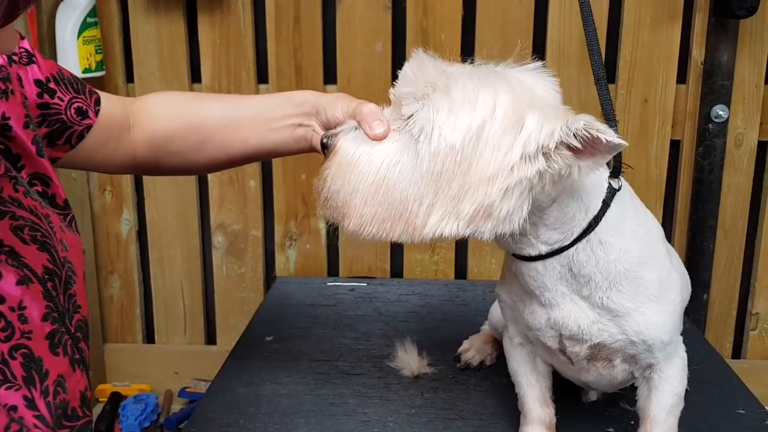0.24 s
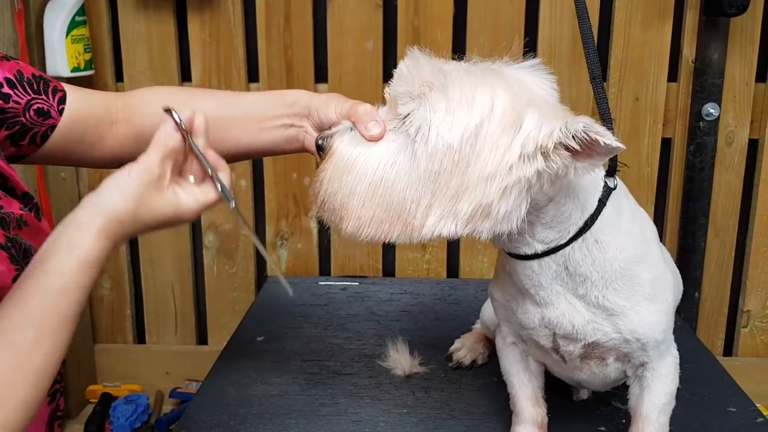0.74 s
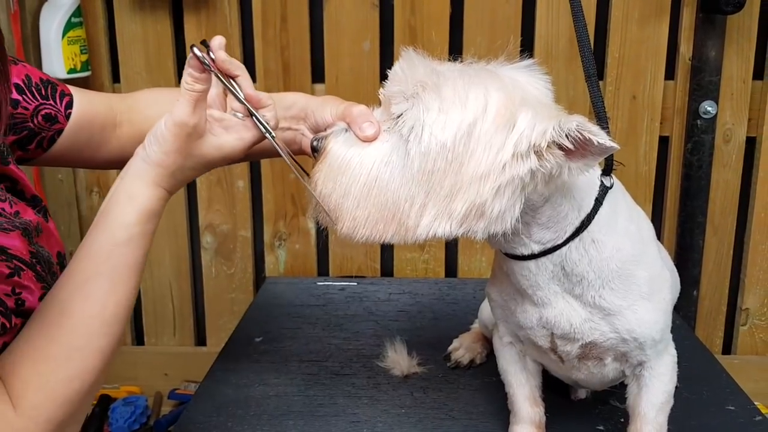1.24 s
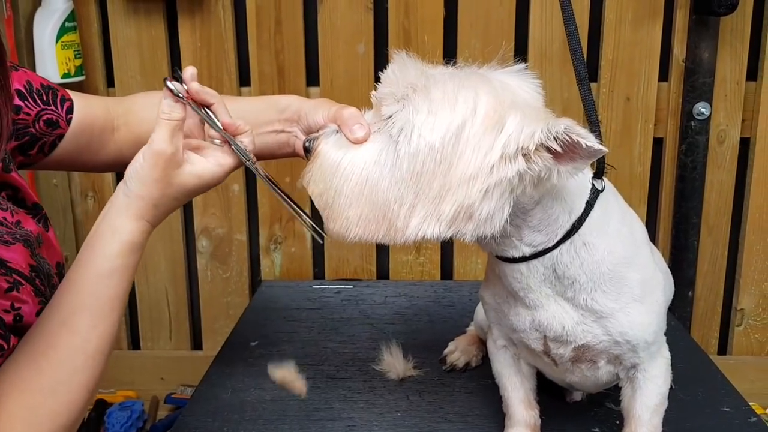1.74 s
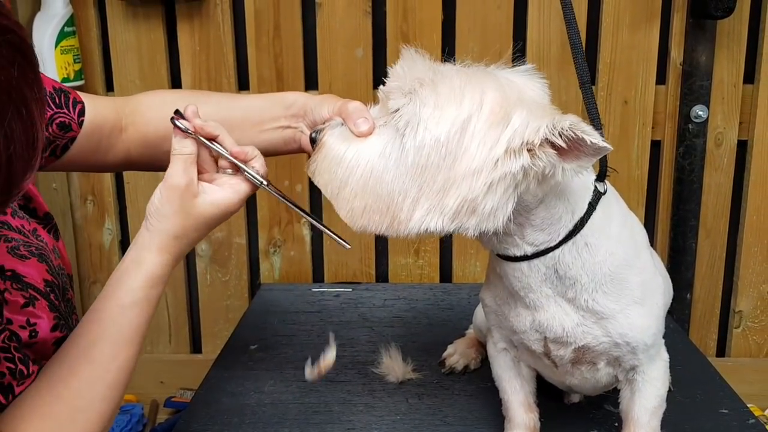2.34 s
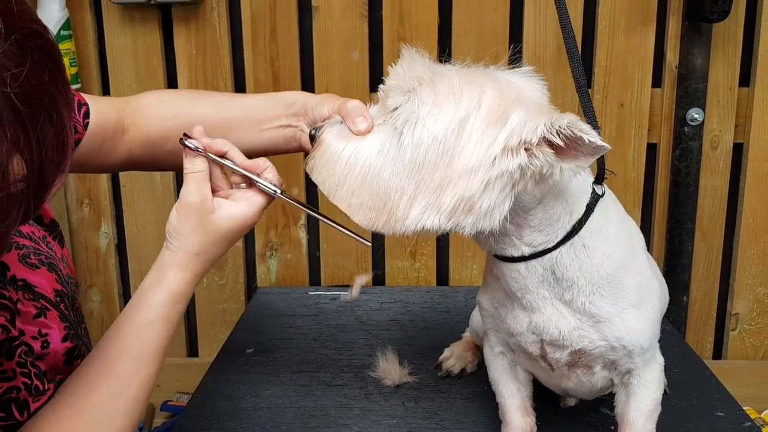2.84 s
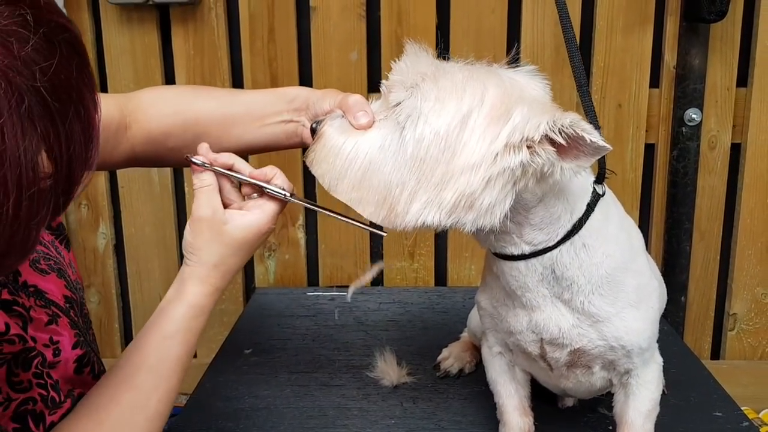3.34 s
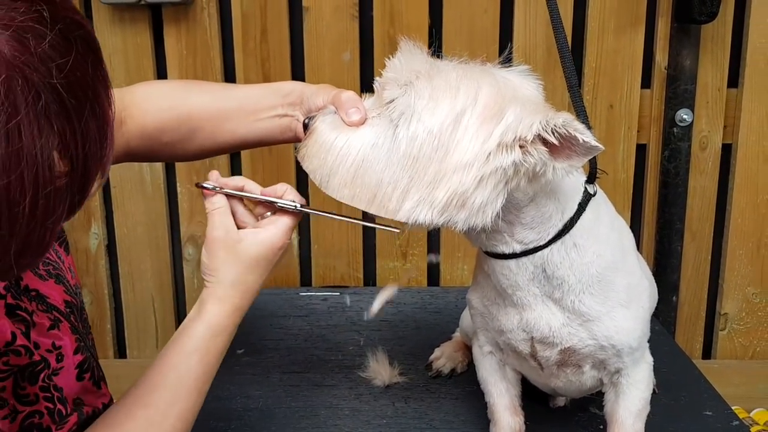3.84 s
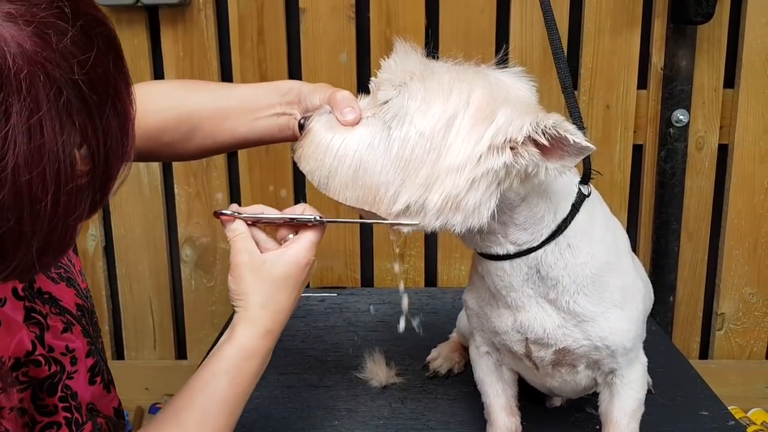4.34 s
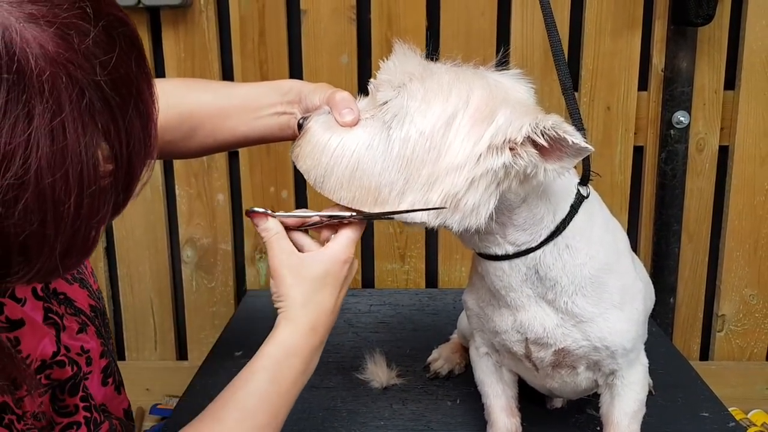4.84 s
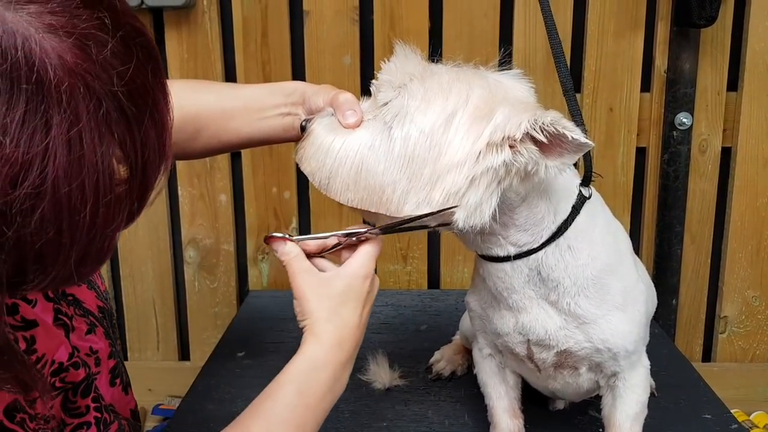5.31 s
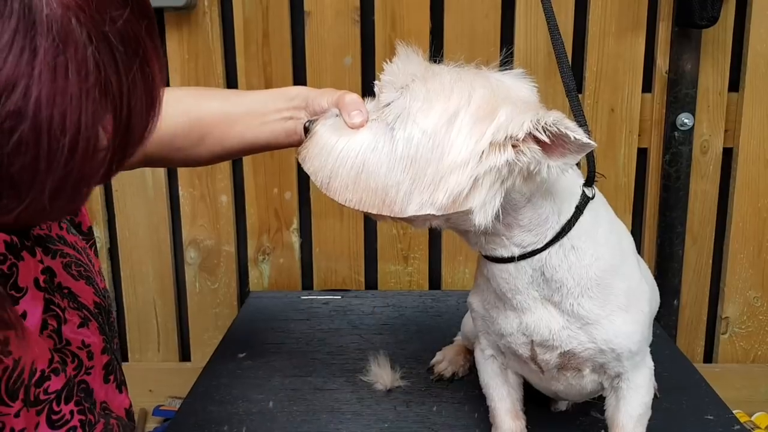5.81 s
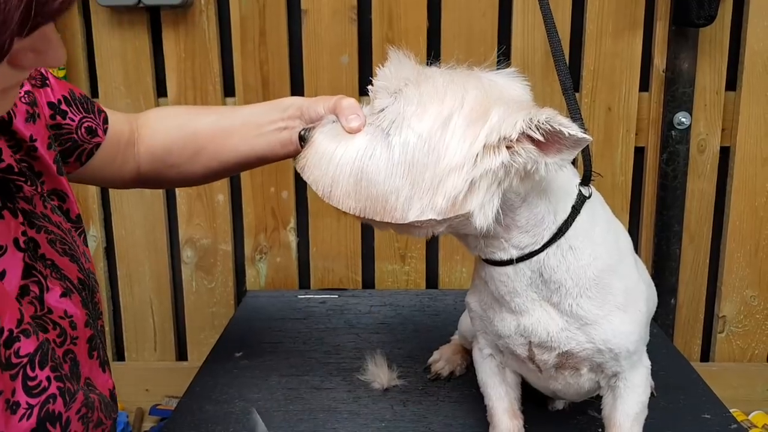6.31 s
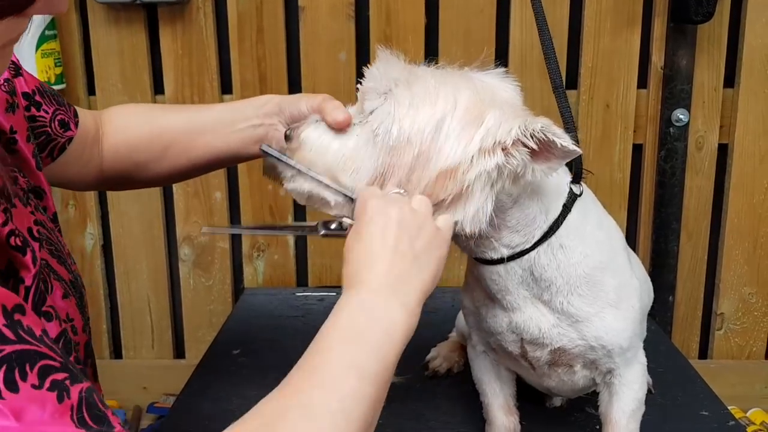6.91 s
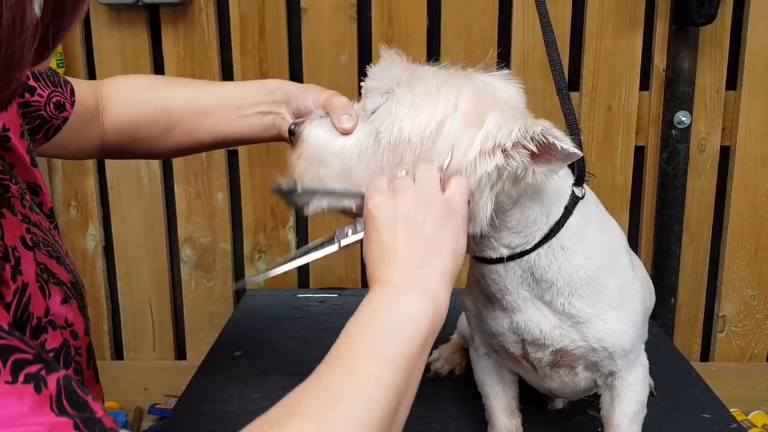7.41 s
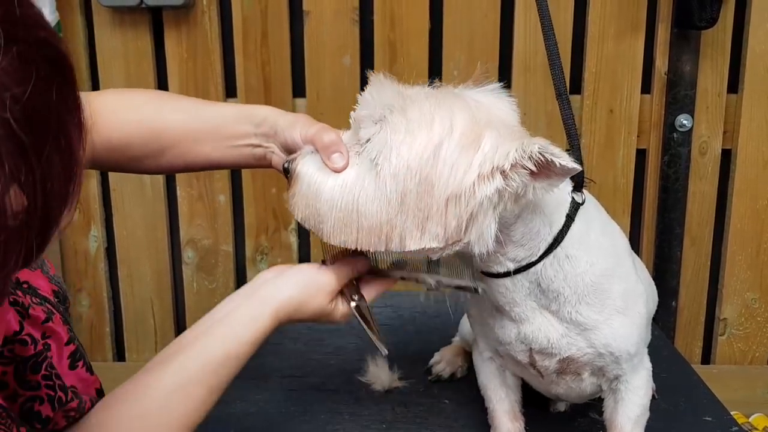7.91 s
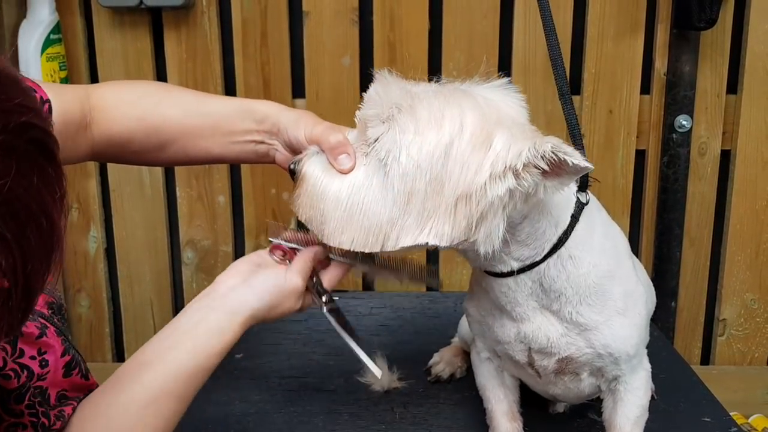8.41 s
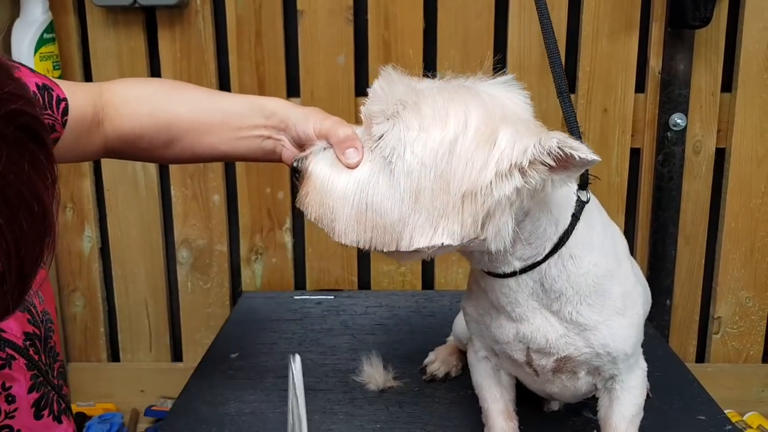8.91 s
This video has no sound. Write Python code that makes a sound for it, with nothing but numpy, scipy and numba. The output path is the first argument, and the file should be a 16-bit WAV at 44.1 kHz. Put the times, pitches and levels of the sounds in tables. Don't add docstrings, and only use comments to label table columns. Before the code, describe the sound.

Steel scissors snip slowly through crunchy dog hair with bright hisses and clicks, then tools clatter loudly onto a booming table in a small room.

```python
import sys
import numpy as np
from scipy import signal
from scipy.fft import rfft, irfft, next_fast_len
from scipy.io import wavfile
from scipy.ndimage import uniform_filter1d
from numba import njit

SR = 44100
rng = np.random.default_rng(int(sys.argv[2]) if len(sys.argv) > 2 else 0)


def boost(x):
    u = np.asarray(x, float) / 20
    return 10 ** u


def master(y):
    cut = np.clip(np.atleast_2d(y).T, -1, 1)
    pcm = np.round(cut * 32767)
    wavfile.write(sys.argv[1], SR, pcm.astype(np.int16))


N = 403956

# [bite t/s, run-up/s, cut level/dB, shut t/s, shut level/dB]
CLOSINGS = [
    (1.57, 0.14, -72, 1.608, -53.5),
    (2.185, 0.11, -53, 2.226, -49),
    (2.734, 0.045, -56.5, 2.804, -47.5),
    (3.246, 0.038, -54, 3.316, -44.5),
    (3.741, 0.035, -52, 3.808, -45.5),
    (4.222, 0.035, -59.5, 4.294, -45),
    (4.4, .03, -62.5, 4.454, -42),
    (4.935, 0.035, -57, 5.012, -45.5),
    (5.406, 0.025, -53.5, 5.467, -58),
]
# [peak t/s, peak level/dB, squeak f/Hz]
OPENINGS = [
    (1.788, -44, 7800),
    (2.419, -42, 8200),
    (2.962, -40.5, 8970),
    (3.49, -41.5, 8630),
    (3.973, -42, 9060),
    (4.637, -44, 8860),
    (5.197, -52, 8300),
]
# [f/Hz, level per Hz/dB]
SLIDE_SPECTRUM = [(3530, -51), (6000, -12.5), (7680, -16), (8640, 0), (9370, -7.5), (10700, -5.5),
                  (11900, -7), (13000, -10), (15800, -18)]
# [f/Hz, level per Hz/dB]
CRUNCH_SPECTRUM = [(1060, -46), (1800, -18), (3250, -18), (4380, -4), (4910, 1), (5700, 0), (7500, -10),
                   (9750, -36), (16500, -120)]
# [peak t/s, length/s,
# level/dB, f/Hz]
SQUEALS = [(.808, .015, -62.5, 4800), (0.83, 0.058, -58, 8400), (0.855, 0.028, -59.5, 7000),
           (0.834, .06, -62, 11000), (1.512, 0.044, -62.5, 8800), (1.569, 0.029, -56.5, 8100),
           (1.57, 0.026, -52.5, 9500), (1.57, 0.031, -57, 12500), (1.792, 0.017, -54, 8100),
           (2.158, .02, -62, 8800), (2.185, .015, -51.5, 9300), (2.227, .02, -50, 12400),
           (2.426, 0.014, -53, 8300), (2.428, .012, -59, 6060), (2.73, 0.023, -55.5, 8400),
           (2.755, .02, -56, 9000), (2.778, .014, -51, 10000), (2.781, .014, -55, 13500),
           (2.969, .008, -47, 8500), (2.97, 0.018, -51, 11000), (3.244, 0.013, -52.5, 9650),
           (3.265, .02, -57, 12700), (3.31, .02, -47, 12000), (3.506, 0.024, -52, 8900),
           (3.74, .03, -62, 9600), (3.804, 0.03, -41.5, 12400), (3.986, .02, -50, 8800),
           (4.229, 0.037, -56, 9700), (4.245, .05, -61, 12700), (4.331, 0.063, -58.5, 8700),
           (4.648, .03, -57, 6400), (2.697, .05, -74, 9500), (3.277, 0.065, -64, 4320),
           (3.769, 0.054, -62, 4470), (2.744, 0.045, -65.5, 4900), (4.257, 0.076, -61.5, 4700),
           (4.267, .015, -54, 8860), (4.304, .03, -50, 12400), (4.454, .015, -46.5, 8670),
           (4.455, .015, -54, 12500), (4.638, 0.028, -57, 8900), (4.958, 0.056, -63, 4900),
           (5.011, 0.021, -45, 8300), (5.013, 0.029, -46.5, 12400), (5.208, 0.019, -50, 8200),
           (5.406, 0.013, -49.5, 8300), (5.429, 0.014, -48, 8200), (5.427, .016, -51, 12000),
           (5.469, 0.014, -41, 8170), (5.47, 0.011, -40, 12200), (4.215, 0.076, -70, 720),
           (4.348, .2, -71, 900), (.5, .2, -64, 125), (.78, 0.23, -62, 127.5), (7.755, 0.0046, -62, 4500)]
# [end t/s, peak level/dB, from f/Hz, to f/Hz]
WHISTLES = [(2.423, -36.5, 10300, 8300), (2.97, -42, 10500, 8600), (3.495, -31.5, 11500, 8700),
            (3.9785, -30, 11500, 8800), (5.2025, -46, 9000, 8400), (5.206, -44, 8500, 8250)]
# [t/s, peak level/dB, main ring f/Hz, handle thud level/dB]
TICKS = [(0.124, -65, 8810, -70), (0.2269, -58.5, 9600, -82), (0.6, -67, 5140, -66),
         (0.724, -54, 8360, -67), (1.6118, -38.5, 11160, -54.5), (2.2335, -37, 10800, -59),
         (2.8054, -32, 8300, -48.5), (3.3176, -38, 12000, -53), (3.811, -43, 12700, -61),
         (4.392, -63, 11000, -85), (4.4555, -35.5, 4070, -53), (5.015, -43.5, 8200, -61.5),
         (5.4675, -38, 7800, -60), (5.896, -68, 3000, -65), (6.432, -42, 8560, -72),
         (6.4872, -40, 8600, -60), (7.2914, -46, 7950, -76), (7.4494, -61, 11700, -86),
         (7.7537, -52, 10100, -75), (8.7194, -57, 6520, -76), (.738, -75, 3000, -61.5),
         (8.794, -63, 8620, -85), (9.136, -59, 11000, -85)]
# [f/Hz, level/dB, t60/s]
BLADE_MODES = [(3670, -19, 0.0025), (4900, -6, 0.005), (8300, 2, 0.0081), (8710, -3, 0.028),
               (9940, -4, 0.006), (12000, 1, 0.0075)]
# [f/Hz, level/dB, t60/s]
HANDLE_MODES = [(443, 3, 0.017), (645, 0, 0.028), (1100, -3, 0.011), (2590, -12, 0.015)]
# [t/s, crack level/dB, crack f/Hz, knuckle
# level/dB, knuckle f/Hz]
STOPS = [(1.612, -57, 2650, -56, 560), (2.2345, -44, 6060, -56, 594), (2.8064, -45, 3650, -49, 623),
         (3.3182, -41, 3650, -52, 600), (3.8121, -53, 2500, -56, 560), (4.4567, -41, 3960, -51, 500),
         (5.015, -58, 3870, -55, 477), (5.469, -54, 3800, -60, 480), (3.3185, -53, 2640, -54, 660),
         (2.8068, -54, 2900, -52, 470), (2.2344, -56, 2540, -62, 1000), (6.2588, -35, 8860, -36.5, 330)]
# [t/s, peak level/dB, contact cut-off f/Hz, clatter re body/dB, slap level/dB]
BLOWS = [(.002, -43.5, 500, -6, -69), (.07, -44.5, 405, 0, -79), (5.9, -54.5, 700, 8, -80),
         (6.032, -58, 300, 11, -74), (6.259, -47, 2500, -19, -33.5), (6.283, -56, 2840, 17.5, -60),
         (6.31, -53, 2510, 14, -60), (6.345, -60.5, 2000, 15, -65), (6.278, -36.5, 426, -4, -60),
         (6.303, -41, 414, -2, -52), (8.814, -68, 2500, -2, -53.5), (8.863, -68, 2500, 1.5, -50),
         (8.868, -48, 2520, 6, -63), (8.875, -45.5, 2500, -5, -46), (8.899, -44, 3270, 16.5, -63),
         (8.9, -17.5, 346, 4.5, -55), (8.908, -16.5, 850, 7.5, -55), (8.919, -12.5, 1530, -6.5, -64),
         (8.932, -23.5, 865, -3, -62), (8.955, -19.5, 880, 1.5, -61), (8.986, -40.5, 2780, 12, -57),
         (9.005, -18, 1500, -3, -62), (9.021, -25, 2000, 9.5, -46), (9.051, -23.5, 900, 3, -55),
         (9.091, -37.5, 1610, 8, -61)]
# [f/Hz, level/dB, t60/s]
TABLE_MODES = [(114.7, -10, 0.3), (162, -19, 0.16), (217.6, -7, 0.11), (248, -6.5, 0.12),
               (308.8, -5.5, 0.2), (376.6, -8, 0.11), (454, -5, 0.2), (525.5, -8.5, 0.14), (599, -1, 0.088),
               (690, -4, 0.059), (756, 2, 0.062), (850, -26, 0.084), (920, -5.5, 0.043),
               (1024, -2.5, 0.054), (1152, 2, 0.039), (1250, -27, 0.067), (1620, -16, 0.043),
               (1745, -1, 0.06), (2039, -2, 0.061), (2367, -3.5, 0.052)]
# [f/Hz, level per Hz/dB]
SLAP_SPECTRUM = [(710, -53), (1200, -21), (3170, -3), (3530, -13), (5610, -2), (6600, -6), (10300, 5.5),
                 (13000, 3), (15800, -4)]
# [t/s, peak level/dB, f/Hz, t60/s]
PANEL_NOTES = [(6.258, -37, 215, 0.12), (6.278, -37.5, 215, 0.22), (6.274, -44, 520, .15),
               (6.26, -46, 754, 0.088), (6.274, -41, 377, 0.17), (6.296, -35, 377, 0.18),
               (6.31, -51, 1290, .08), (8.899, -13, 253, .07), (8.914, -15, 218, 0.28),
               (9.006, -27.5, 218, 0.32), (0.0021, -45, 213, 0.33), (8.91, -29, 180, 0.18),
               (8.92, -30, 2070, .08), (8.93, -25, 740, .07), (8.925, -15.5, 378, 0.23),
               (8.915, -20, 311, 0.27), (8.908, -18.5, 285, 0.093), (8.905, -26.5, 114, .28),
               (8.95, -22, 578, .1), (8.945, -30, 1061, .08), (9.006, -24, 1010, .1),
               (9.006, -27, 1180, 0.074), (9.02, -25, 750, .07), (9.006, -30, 250, .15),
               (9.045, -28.5, 311, .3), (9.08, -40, 1100, .06), (8.92, -27, 500, 0.24),
               (8.92, -28, 605, 0.094), (9.01, -36, 2073, .14), (8.918, -31, 1800, .07),
               (9.005, -29, 1745, 0.092), (9.036, -31, 1745, 0.11), (8.918, -23, 735, .08),
               (8.92, -26, 750, .07), (8.919, -27, 1110, 0.06), (8.92, -22, 1000, 0.083),
               (9.006, -31, 840, 0.11), (9.05, -27, 378, 0.25), (9.052, -30, 455, 0.11)]
# [t/s, peak level/dB, favoured mode f/Hz, its t60/s]
CLINKS = [(8.817, -68, 4360, 0.99), (8.9, -59, 4340, 0.31), (8.815, -56, 12750, 0.13),
          (8.815, -52, 8050, .03), (8.863, -55, 10050, 0.43), (8.874, -44.5, 6370, 0.019),
          (8.874, -39.5, 12720, 0.058), (8.878, -48.5, 7640, 0.4), (8.986, -53, 7660, 0.2),
          (9.006, -54, 12800, .1), (9.078, -60, 12800, .12), (8.878, -49.5, 8500, 0.18),
          (8.985, -60, 12700, .25), (9.023, -60, 6150, 0.3), (9.032, -49, 12800, 0.091),
          (9.01, -60, 10050, 0.46), (9.09, -55, 4500, 0.015)]
# [f/Hz, level/dB, t60/s]
STEEL_MODES = [(5140, -13.5, 0.032), (7800, -4.5, .02), (9370, -13, .03), (11000, -22, 0.036),
               (14500, -21, 0.05)]
# [peak t/s, swell/s, fade/s, bright level/dB, dull level/dB]
MOVES = [(0.0, .05, 0.31, -71, -55.5), (.236, 0.06, 0.22, -73, -66), (.76, 0.58, 0.092, -67, -66),
         (.83, 0.068, 0.097, -58, -93), (.86, 0.17, 0.5, -61.5, -58.5), (4.22, 0.13, 0.14, -73, -68.5),
         (4.308, 0.13, 0.17, -65, -71), (4.42, 0.04, 0.25, -71, -68), (5.914, 0.045, 0.19, -86, -78),
         (5.98, 0.13, 0.58, -74, -63.5), (6.36, .1, .3, -72, -80), (6.435, 0.017, 0.076, -58.5, -69),
         (6.49, 0.019, 0.094, -56, -59), (6.73, .01, 0.017, -71, -93), (6.56, 0.071, 1, -72.5, -75.5),
         (7.3, 0.033, 0.12, -60, -85), (7.35, 0.17, 0.1, -92, -76), (7.52, .12, 0.27, -84, -69),
         (7.65, 0.41, 0.13, -72.5, -97), (7.76, 0.011, 0.11, -67, -82), (7.89, 0.27, 0.24, -70, -70.5),
         (8.27, 0.34, 0.17, -78, -70), (8.63, 0.19, 0.37, -70.5, -78), (8.86, 0.4, .03, -74, -62.5)]
# [f/Hz, level per Hz/dB]
RUB_SPECTRUM = [(1470, -20), (2500, -6.5), (3200, -14), (3850, -6), (6020, -5.5), (8590, -2.5), (11300, -7),
                (15800, -18)]
# [f/Hz, level per Hz/dB]
SWISH_SPECTRUM = [(200, -14), (400, -5.5), (591, 0.5), (2430, -16), (3140, -29), (3500, -36), (4550, -59),
                  (7700, -120)]
# [t/s, hum level/dB]
MOTOR = [(0.0, -52.5), (0.32, -61), (0.86, -59), (1.7, -65.5), (3.0, -66.5), (4.6, -65), (5.7, -67),
         (5.9, -61), (6.3, -66.5), (6.9, -65), (8.7, -66.5)]
# [f/Hz, level per Hz/dB]
FLOOR_SPECTRUM = [(12, -24), (20, 2.5), (74, -0.5), (146, -5), (168, -7), (198, -13), (293, -15),
                  (459, -20.5), (527, -22), (1120, -22.5), (1400, -34.5), (2200, -37.5), (5080, -42),
                  (10200, -40), (14700, -40.5), (16000, -42.5)]
# [f/Hz, likeness]
LIKENESS = [(60, 0.95), (150, 0.87), (380, 0.77), (950, -0.19), (2380, -0.11), (5980, -0.069),
            (15000, -0.096)]
SWAY_DB = (3, 2.5, 1.5, 1.2, .4)
# [f/Hz, t60/s, left-right likeness]
ROOM_BANDS = [(148, 0.37, 1), (594, 0.14, 0.7), (2000, 0.23, 0.064), (5800, 0.085, 0.056),
              (12000, 0.032, 0.05)]


def strokes():
    spans = [closing(*row) for row in CLOSINGS] + [opening(*row) for row in OPENINGS]
    gate, slide_db, crunch_db, sizzle_db, squeak_hz = in_time(spans)
    slips = grains(6000, spread_db=4.5) * boost(2.8 * drift(150))
    squeak_width_hz = 350
    squeak = rms_one(moving_peak(slips, squeak_hz, np.exp(-np.pi * squeak_width_hz / SR), SR))
    edge = colour(slips, SLIDE_SPECTRUM)
    blade_ring = rms_one(ring(slips, 8820, 0.03))
    slide = patchy(edge, 6700, 11550, patch_db=2.0) + boost(-8) * squeak + boost(-22) * blade_ring
    sizzle = patchy(edge, 11430, 16300, patch_db=1.5)
    hairs = colour(grains(4000, spread_db=2.5), CRUNCH_SPECTRUM)
    crunch = patchy(hairs, 1830, 7220, patch_db=4.5)
    return gate * boost(slide_db - 2.0) * (slide + boost(crunch_db) * crunch + boost(sizzle_db + 4.5) * sizzle)


def closing(bite_s, run_up_s, cut_db, shut_s, shut_db):
    approach_db, sag_db_per_s, rush_s = -23, 27, 0.028
    fade_s, fade_db = 0.067, -40.5
    hinge_hz, tip_hz = 8800, 11040
    rush_start_s = shut_s - rush_s
    rush_start_db = cut_db - sag_db_per_s * (rush_start_s - bite_s)
    s = [bite_s - run_up_s, bite_s, rush_start_s, shut_s, shut_s + fade_s]
    db = [cut_db + approach_db, cut_db, rush_start_db, shut_db, shut_db + fade_db]
    crunch_db, sizzle_db = (-5.5, -8.5, -9, -8.5, -19), (-15, -9, -6, -5, 4)
    hz = np.interp(s, [s[0], shut_s, s[4]], [hinge_hz, tip_hz, hinge_hz])
    return np.transpose([s, db, crunch_db, sizzle_db, hz])


def opening(peak_s, peak_db, squeak_hz):
    s = peak_s + np.array([-0.011, 0, 0.017, 0.086])
    db = peak_db + np.array([-8, 0, -4.5, -36])
    crunch_db, sizzle_db = (-13, -46, -11.5, 1), (-12, -11, -10, -3)
    return np.transpose([s, db, crunch_db, sizzle_db, [squeak_hz] * 4])


def patchy(x, low_hz, high_hz, patch_db):
    edges = np.geomspace(low_hz, high_hz, num=7)
    total = 0
    for pair in zip(edges, edges[1:]):
        band = signal.sosfilt(signal.butter(2, pair, "band", fs=SR, output="sos"), x)
        total = total + band * boost(patch_db * drift(110))
    return rms_one(total)


def squeals():
    out = np.zeros(N)
    width = 0.067
    lead_s = 0.15
    t = np.arange(13230) / SR - lead_s
    for s, length_s, db, hz in SQUEALS:
        limits = [hz * (1 - width / 2), hz * (1 + width / 2)]
        band = signal.butter(1, limits, "band", fs=SR, output="sos")
        grit = rms_one(signal.sosfilt(band, rng.standard_normal(13230)))
        add(out, s - lead_s, boost(db) * grit * np.exp(-(2 * t / length_s) ** 2))
    return out


def ticks():
    out = np.zeros(N)
    high = signal.butter(2, 2200, "high", fs=SR, output="sos")
    dull = signal.butter(1, [330, 1500], "band", fs=SR, output="sos")
    for s, db, hz, thud_db in TICKS:
        push = np.pad(0.34 * rms_one(puff(0.017, size=500)), (0, 2500))
        bright = 0.21 * ring(push, hz, 0.0097)
        bright += 0.11 * strike(BLADE_MODES, push, spread_db=3.0)
        bright += 0.83 * signal.sosfilt(high, push)
        thud = boost(-14.5) * strike(HANDLE_MODES, push, spread_db=3.5)
        thud += boost(2.0) * signal.sosfilt(dull, puff(0.043, size=3000))
        add(out, s, boost(db - 4.5) * bright + boost(thud_db + 1.5) * thud)
    return out


def whistles():
    out, t = np.zeros(N), np.arange(-441, 882) / SR
    glide_s, glide_db, bloom_s = 0.007, -13, 0.0018
    for s, db, from_hz, to_hz in WHISTLES:
        hz = np.interp(t, [-glide_s, 0], [from_hz, to_hz])
        gliding = (t > -glide_s) * (t < 0)
        level = np.exp(-(t / bloom_s) ** 2) + boost(glide_db) * gliding
        add(out, s + t[0], boost(db) * level * np.sin(2 * np.pi * np.cumsum(hz) / SR))
    return out


def stops():
    out, click = np.zeros(N), np.pad([1.], (0, 4000))
    for s, crack_db, crack_hz, knuckle_db, knuckle_hz in STOPS:
        crack = boost(crack_db) * ring(click, crack_hz, t60=0.01)
        knuckle = boost(knuckle_db) * ring(click, knuckle_hz, t60=0.048)
        add(out, s, crack + knuckle)
    return out


def blows():
    out, size = np.zeros(N), 12600
    slap = colour(rng.standard_normal(N), SLAP_SPECTRUM)
    firm = signal.butter(4, 100, "high", fs=SR, output="sos")
    dark = signal.butter(2, 2300, fs=SR, output="sos")
    for s, db, soft_hz, clatter_db, slap_db in BLOWS:
        push = np.pad(1 + 0.13 * puff(0.021, size=600), (0, size - 600)) * decay(0.011, size)
        soft = signal.butter(3, soft_hz, fs=SR, output="sos")
        force = signal.sosfilt(soft, np.diff(push, prepend=0))
        body = strike(TABLE_MODES, force, spread_db=1.0)
        clatter = rms_one(signal.sosfilt(soft, rng.standard_normal(size)))
        low = signal.sosfilt(dark, clatter)
        clatter = (low + (clatter - low) * decay(0.091, size)) * decay(0.16, size)
        add(out, s, boost(db - 3.5) * signal.sosfilt(firm, body + boost(clatter_db - 4.5) * clatter))
        slap_t60 = np.interp(slap_db, [-46, -36], [0.05, 0.095])
        piece = slap[int(s * SR / 2):][:size]
        add(out, s, boost(slap_db + 5.5) * piece * decay(slap_t60, size))
    return out


def notes():
    out, t = np.zeros(N), np.arange(13000) / SR
    rise_s = 0.0027
    for s, db, hz, t60 in PANEL_NOTES:
        level = boost(db - 60 * t / t60) * (1 - np.exp(-t / rise_s))
        add(out, s, level * np.sin(2 * np.pi * hz * t))
    return out


def clinks():
    out, click = np.zeros(N), np.pad([1.], (0, 12000))
    for s, db, hz, t60 in CLINKS:
        add(out, s, boost(db) * (ring(click, hz, t60) + strike(STEEL_MODES, click, spread_db=2.5)))
    return out


def rustle():
    t, bright, dull = np.arange(0, N, 32) / SR, 0, 0
    range_db = 30.5
    for s, swell_s, fade_s, bright_db, dull_db in MOVES:
        shape = boost(-range_db * np.maximum((s - t) / swell_s, (t - s) / fade_s))
        bright = bright + boost(bright_db) * shape
        dull = dull + boost(dull_db) * shape
    bright, dull = (np.interp(np.arange(N) / SR, t, level) for level in (bright, dull))
    rub = [colour(grains(12000, spread_db=5.0), RUB_SPECTRUM) * boost(1.0 + 1.0 * drift(37))
           for side in range(2)]
    swish = [colour(rng.standard_normal(N), SWISH_SPECTRUM) * boost(1.4 * drift(31)) for side in range(2)]
    return bright * np.array(rub) + dull * np.array(swish)


def background():
    t, hum_db = np.arange(N) / SR, in_time([MOTOR])[1]
    rumble_db = -72 + 8 * np.exp(-((t - 4.5) / 2) ** 2) - 15 * np.exp(-(t / 1.24) ** 2)
    drone_db = -73 + 0.27 * (hum_db - hum_db.mean()) - 0.38 * t
    road_db = -82.5 + 7.5 * np.exp(-((t - 2.1) / 4.9) ** 2)
    hiss_db = -76
    size = next_fast_len(N)
    hz = np.maximum(np.fft.rfftfreq(size, 1 / SR), 1)
    alike = np.clip(amp_of_hz(LIKENESS, hz), -1, 1)
    mid, side = rfft(rng.standard_normal((2, size))) * boost(amp_of_hz(FLOOR_SPECTRUM, hz))
    pair = correlated(mid, side, alike)
    edges = np.log([25, 60, 250, 750, 1400, 40000])
    out = 0
    for k, db in enumerate([rumble_db, hum_db, drone_db, road_db, hiss_db]):
        above = 1 / (1 + np.exp(-8 * (np.log(hz) - edges[k]))) if k else 1
        below = 1 / (1 + np.exp(8 * (np.log(hz) - edges[k + 1])))
        band = rms_one(irfft(pair * np.sqrt(above * below), size)[:, :N])
        out = out + band * boost(db + SWAY_DB[k] * drift(5.9))
    motor_level = boost(hum_db - 8 + 3.3 * drift(6.9))
    return out + motor_level * np.sin(2 * np.pi * 117 * t + 1.9 * drift(3.5))


def room(x):
    size = SR // 2
    t, tail, white = np.arange(size) / SR, 0, rng.standard_normal((2, size))
    onset = np.minimum(t / 0.0036, 1)
    for hz, t60, alike in ROOM_BANDS:
        limits = [hz / 2.13, min(hz * 1.6, 19000)]
        band = signal.butter(1, limits, "band", fs=SR, output="sos")
        pair = correlated(white[0], white[1], np.clip(alike, 0, 1))
        tail = tail + signal.sosfilt(band, pair) * decay(t60, size) * onset
    return signal.fftconvolve(x[None], tail / np.sqrt(np.sum(tail ** 2) / 2), axes=1)[:, :N]


def side_walls(x):
    thin = signal.sosfilt(signal.butter(2, 350, "high", fs=SR, output="sos"), x)
    echo = sum(np.interp(np.arange(N) - s * SR, np.arange(N), thin) for s in (0.0021, 0.0047))
    return echo * [[1], [-1]]


def place(x, pan_db, lag):
    late = np.interp(np.arange(N) - lag, np.arange(N), x)
    return np.array([late * boost(pan_db / 2), x * boost(-pan_db / 2)])


def scatter(pair):
    size = next_fast_len(N)
    hz = np.fft.rfftfreq(size, 1 / SR)
    spread_s, band_hz = 0.000593, 500
    treble = np.clip(hz / 1500 - 1, 0, 1)
    delay = [spread_s * np.interp(hz / band_hz, np.arange(100), rng.standard_normal(100)) * treble
             for path in range(2)]
    phase = 2 * np.pi * np.cumsum(delay, axis=1) * hz[1]
    one, other = irfft(rfft(pair[0], size) * np.exp(-1j * phase), size)[:, :N]
    share = np.pi / 4 * (1 + np.tanh(1.5 * drift(5.0)))
    return np.array([np.cos(share) * one + np.sin(share) * other, pair[1]])


def correlated(mid, side, alike):
    return np.sqrt(1 + alike) * mid + np.sqrt(1 - alike) * side * [[1], [-1]]


def strike(modes, push, spread_db):
    own = boost(spread_db * rng.standard_normal(len(modes))) * rng.choice([-1, 1], len(modes))
    return sum(boost(db) * gain * ring(push, hz, t60) for (hz, db, t60), gain in zip(modes, own))


def ring(clicks, hz, t60):
    r, w = boost(-60 / (t60 * SR)), 2 * np.pi * hz / SR
    return signal.lfilter([0, np.sin(w)], [1, -2 * r * np.cos(w), r * r], clicks + 1e-18)


@njit
def moving_peak(x, hz, r, sr):
    y = np.zeros(len(x))
    for i in range(2, len(x)):
        drive = (1 - r * r) / 2 * (x[i] - x[i - 2])
        y[i] = drive + 2 * r * np.cos(2 * np.pi * hz[i] / sr) * y[i - 1] - r * r * y[i - 2]
    return y


def grains(per_s, spread_db):
    sizes = boost(spread_db * np.minimum(rng.exponential(1, N), 4)) * rng.choice([-1, 1], N)
    return sizes * (rng.random(N) < per_s / SR)


def decay(t60, size):
    return boost(-60 * np.arange(size) / SR / t60)


def puff(t60, size):
    return rng.standard_normal(size) * decay(t60, size)


def drift(rate):
    steps = rng.standard_normal(int(N / SR * 200))[:int(N / SR * rate) + 2]
    return np.interp(np.arange(N) * rate / SR, np.arange(len(steps)), steps)


def amp_of_hz(points, hz):
    return np.interp(np.log(hz), np.log(np.array(points)[:, 0]), np.array(points)[:, 1])


def colour(x, points):
    size = next_fast_len(len(x))
    hz = np.maximum(np.fft.rfftfreq(size, 1 / SR), 1)
    return rms_one(irfft(rfft(x, size) * boost(amp_of_hz(points, hz)), size)[:len(x)])


def rms_one(x):
    return x / np.sqrt(np.mean(x ** 2) + 1e-20)


def in_time(tables):
    t, gate, rows = np.arange(N) / SR, np.zeros(N), np.vstack(tables)
    s, *columns = rows[np.argsort(rows[:, 0])].T
    for table in tables:
        gate[(t >= table[0][0]) & (t <= table[-1][0])] = 1
    return [uniform_filter1d(gate, size=100)] + [np.interp(t, s, column) for column in columns]


def add(out, s, x):
    i = int(s * SR)
    out[i:i + len(x)] += x[:len(out) - i]


def scene():
    scissors = strokes() + ticks() + squeals()
    table, steel, stop = blows(), clinks(), stops()
    moving = place(scissors, pan_db=-4.0, lag=3 + 1.35 * drift(2.494))
    near = place(whistles(), pan_db=-6.0, lag=0.8) + place(stop, pan_db=-2.0, lag=0.6)
    near += place(notes(), pan_db=1.0, lag=0.3)
    near += place(table, pan_db=0.9, lag=1.54) + place(steel, pan_db=-1.6, lag=0.66)
    echoes = room(boost(-5) * scissors + boost(-8.0) * table + boost(-11.5) * (steel + stop))
    echoes += side_walls(boost(-11.5) * scissors + boost(-16) * table)
    return near + echoes + rustle() + background() + scatter(moving)


def low_pass(x):
    return signal.sosfilt(signal.butter(12, 16440, fs=SR, output="sos"), x)


def record(dry):
    rounded = 1.1 * np.tanh(dry / 1.101)
    top_cut = signal.cheby2(18, 60, 16130, fs=SR, output="sos")
    mix = signal.sosfilt(top_cut, rounded)
    return low_pass(mix)


dry = scene()
out = record(dry)
master(out)
```